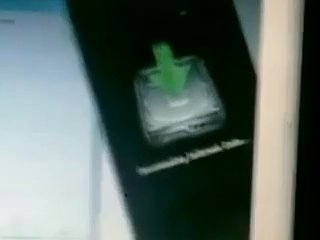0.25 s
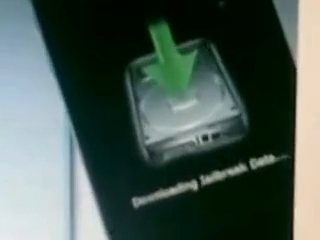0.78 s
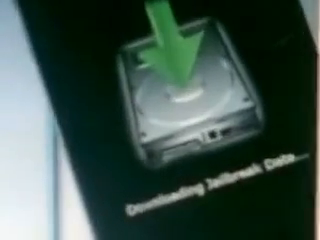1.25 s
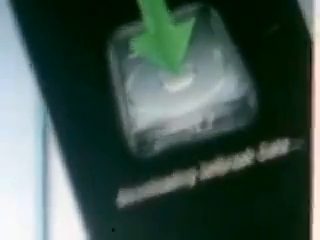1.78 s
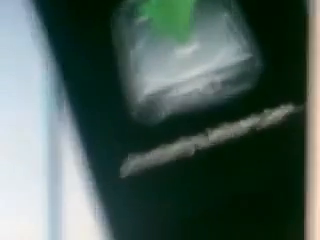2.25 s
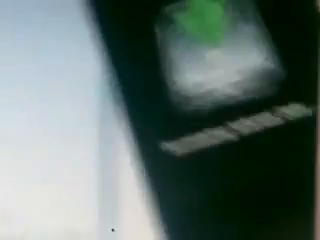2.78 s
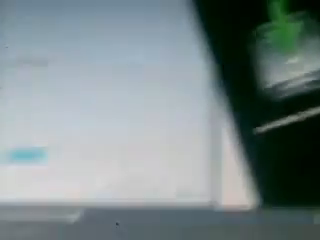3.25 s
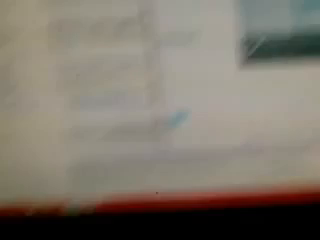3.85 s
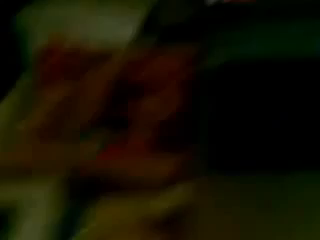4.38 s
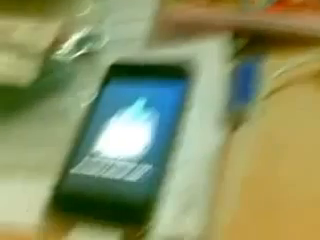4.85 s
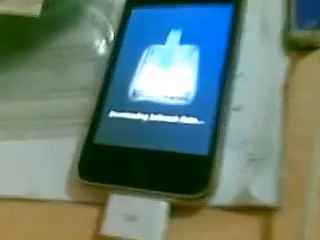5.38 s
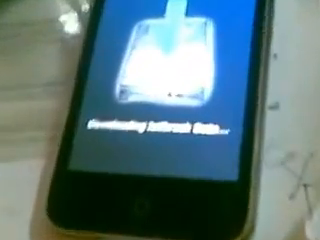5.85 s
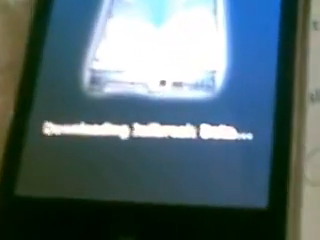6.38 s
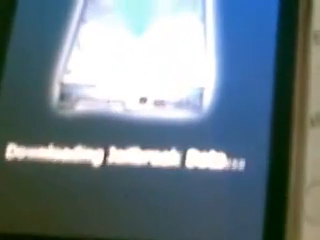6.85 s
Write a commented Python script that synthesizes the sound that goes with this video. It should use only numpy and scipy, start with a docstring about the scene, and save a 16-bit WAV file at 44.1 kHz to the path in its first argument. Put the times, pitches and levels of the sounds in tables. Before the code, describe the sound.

In a quiet indoor room, a small cheap microphone picks up its own casing being gripped and moved. Short dry knocks with crisp plastic clicks come singly and in two irregular clusters, the second busier and scuffed by fingers. Beneath them runs a soft constant buzz, slightly changing in colour, with low hum, rumble and hiss.

```python
"""A small hand-held camera is moved about indoors. Faint knocks and rubs on its plastic casing come first,
a hard knock at 1 s, a cluster from 2 to 2.6 s, a denser one from 4.6 to 5.4 s with the strongest rub, and
a last knock near 6.5 s. Knocks are decaying modes, clicks short noise bursts, rubs grainy noise.
Throughout lie a buzz of overtones whose colour changes with the grip, mains hum, preamplifier hiss and
rumble, and low-mid room noise."""
import sys
import numpy as np
from scipy.fft import rfft, irfft, next_fast_len
from scipy.io import wavfile
from scipy.ndimage import uniform_filter1d, map_coordinates

SR = 44100
rng = np.random.default_rng(int(sys.argv[2]) if len(sys.argv) > 2 else 0)


def pcm_store(signal):
    """Save signal as 16-bit PCM."""
    levels = np.round(np.clip(np.atleast_2d(signal), -1, 1) * 32767)
    wavfile.write(sys.argv[1], SR, levels.astype(np.int16).T)


N = 313639

# Dull knocks on the shell. Each row: start in seconds, shell peak in dB, pitch in Hz, thump level in dB,
# hardness in dB added to the upper modes, loss in dB at each rebound (twice that for the thump).
KNOCKS = [(0.158, -45, 586, -64, -6, 30), (0.251, -44, 636, -55, -5, 30), (0.9964, -9.5, 289, -28.5, 6, 16),
          (1.9872, -30, 298, -52, 7, 8), (2.006, -10, 425, -25.5, 0.5, 21), (2.047, -30.5, 376, -51, 2, 10),
          (2.074, -33.5, 487, -61, -4, 30), (2.084, -23, 386, -44, -9, 13),
          (2.1685, -15.5, 364, -28, -4.5, 15), (2.189, -44, 150, -39, -11, 14),
          (2.2815, -38, 580, -43, -14, 21), (2.2951, -27, 530, -31, -10.5, 14),
          (2.3107, -34, 310, -37, -13, 15), (2.345, -39, 150, -31, -11, 6), (2.357, -23.5, 291, -36, 0, 17),
          (2.367, -37, 151, -28, 11, 19), (2.562, -43, 300, -46, 4, 30), (2.582, -13, 587, -22, -2, 30),
          (4.6156, -35, 314, -54, -3, 33), (4.639, -36.5, 605, -43, 1, 30),
          (4.688, -12, 566, -19, -2.5, 8.5), (4.8988, -27, 363, -33, -0.5, 30),
          (4.9337, -38, 150, -41, -8, 9), (4.9515, -20.5, 270, -28, 1, 34),
          (4.9697, -35, 150, -37, -11, 30), (4.9827, -25, 403, -45, 17.5, 30),
          (4.9877, -6, 508, -15.5, -7.5, 11), (5.0062, -34, 300, -43, -8, 17),
          (5.1354, -26.5, 239, -34, 8, 30), (5.1425, -23, 211, -48, 15, 30),
          (5.1479, -26, 147, -22.5, 10, 24), (5.23, -46, 490, -50, -5, 30),
          (5.272, -37.5, 240, -49, -2, 30), (5.3666, -11, 482, -27, -3, 31),
          (6.5312, -9, 264, -21.5, 5, 15.5)]
# Bending modes of the shell. Each row: multiple of the pitch, mean relative level in dB.
SHELL_MODES = [(1.001, 0.5), (1.45, -3.5), (2.1, -5), (2.9, -8.5)]
# Rocking of the whole body. Each row: frequency in Hz, relative level in dB, t60 in seconds.
THUMP_MODES = [(68, 3.5, 0.022), (132, 6, 0.016)]
# Snaps of the plastic seams. Each row: peak time in seconds, then snap, crack and tick levels in dB.
CLICKS = [(0.95, -52, -43, -50), (0.9613, -48, -43, -36.5), (0.998, -11.5, -13.5, -20),
          (2.0044, -19, -25, -19), (2.0053, -21.5, -14, -19), (2.0836, -24.5, -24.5, -39),
          (2.167, -32, -38.5, -44), (2.1865, -44, -60, -61), (2.2919, -46, -43.5, -40),
          (2.296, -35, -51, -59), (2.3557, -32, -40.5, -33), (2.3592, -35.5, -43, -53),
          (2.552, -41, -55, -60), (2.584, -25, -23.5, -33), (4.5644, -33.5, -30.5, -25),
          (4.6149, -29, -24, -32), (4.64, -26, -23, -21.5), (4.686, -55, -38, -35), (4.69, -23, -36, -36),
          (4.6946, -25.5, -30.5, -20.5), (4.9188, -44, -47, -47), (4.935, -44, -46, -55),
          (4.952, -33.5, -52, -55), (4.9658, -37, -38, -42), (4.985, -24, -47, -48),
          (4.9886, -23.5, -22.5, -30), (4.9917, -21, -17.5, -23), (4.996, -41, -41, -36),
          (5.0008, -33, -32, -31), (5.1353, -35, -47, -58), (5.1471, -31.5, -36, -42.5),
          (5.3676, -15.5, -29.5, -23), (6.5078, -46.5, -39, -41), (6.532, -14.5, -23, -25),
          (6.8368, -57, -53, -43.5)]
# Spectra of the three click bands. Each row: frequency in Hz, relative density in dB per Hz.
SNAP_SPECTRUM = [(600, -65), (1100, 5.5), (1500, -1), (2300, 3), (3300, -8), (6000, -76)]
CRACK_SPECTRUM = [(1500, -43), (2500, -22), (3200, 1), (4700, 0.5), (6500, -5), (10000, -36)]
TICK_SPECTRUM = [(4000, -83), (6000, 6), (8400, 8), (11000, 5.5), (14500, 1.5), (16500, -36)]
# Finger slides over the shell. Each row: start in seconds, bright level in dB, dull level in dB,
# t60 in seconds.
RUBS = [(0.294, -49, -67, 0.22), (0.517, -38.5, -56.5, 0.24), (1.65, -50, -70, 0.11),
        (2.168, -49, -40, 0.16), (2.269, -53, -45, 0.2), (2.343, -53, -34.5, 0.11), (2.62, -54, -64, 0.17),
        (4.91, -52, -50, 0.36), (4.983, -25.5, -19, 0.073), (5.135, -40, -26, 0.078),
        (5.215, -61, -50, 0.13)]
# Friction through the body (dull) and on the skin of the shell (bright).
# Each row: frequency in Hz, relative density in dB per Hz.
DULL_SPECTRUM = [(60, -32), (200, -1.5), (600, -1.5), (1200, -18), (2500, -28), (6000, -120)]
BRIGHT_SPECTRUM = [(530, -19), (900, -11), (1600, 7), (2230, 2), (2540, 5), (3170, 0), (3530, -3.5),
                   (15000, -17.5)]
# Buzz overtones before grip and waver. Each row: frequency in Hz, level in dB rms.
BUZZ = [(293, -72.5), (586, -76), (1170, -73.5), (1760, -79), (2050, -72.5), (2340, -67), (2930, -66),
        (3220, -65.5), (3520, -70), (3810, -69.5), (4400, -74.5), (5300, -83.5), (7300, -90), (7910, -77),
        (8200, -76.5), (8800, -98), (11400, -91), (12300, -74), (12900, -77), (13500, -90)]
# Grips that recolour the buzz. Each row: start in seconds, then level, lean, scoop and flank in dB.
GRIPS = [(0, 1, 3.5, 5, -1.5), (1.0, -1.5, -7, 2.5, 0.5), (1.9, -0.2, -5, -4, 0.5),
         (2.4, 1.3, 2.5, -1.5, 1), (2.7, 1.9, 1, -0.5, -4.5), (4.6, 1.5, 3, -2, 1),
         (4.9, -0.5, -5, -2, -.5), (5.3, -2.5, 0.5, 3.5, 0.5), (5.7, -1, 1, 3, 0.5),
         (6.55, -0.7, -3.5, .5, 1)]
# How far each colour moves an overtone. Each row: frequency in Hz, share of the colour's dB.
LEAN_SHARE = [(2050, -0.4), (2930, -0.18), (3220, -0.51), (3810, 1.0), (4400, -0.3), (8000, 0.03),
              (12300, -0.15)]
SCOOP_SHARE = [(2050, 0.13), (2640, -0.18), (3220, -0.39), (3520, 0.54), (4100, 0.51), (8000, -0.67),
               (12300, .7)]
FLANK_SHARE = [(1760, 0.15), (2050, 1), (2340, .8), (2640, 0.06), (11700, .05), (12300, 1.1), (12900, .3)]
# Resonance setting the overtone phases: centre in Hz, width in Hz.
PULSE_RING = (3200, 800)
# Preamplifier hiss and rumble. Each row: frequency in Hz, relative density in dB per Hz.
HISS_SPECTRUM = [(10, -11), (25, 4), (80, 0), (130, -6.5), (250, -6.5), (600, -33.5), (1000, -20),
                 (1250, -15), (2200, -17), (3000, -18.5), (5500, -25), (9000, -23.5), (15000, -21.5)]
# Low-mid room noise over time. Each row: time in seconds, level in dB rms.
ROOM_LEVEL = [(0.0, -58.5), (1.39, -60.5), (1.82, -60), (2.15, -57), (2.4, -59.5), (3.11, -60),
              (4.32, -61.5), (5.23, -62), (5.58, -66), (5.96, -63.5), (6.59, -62.5), (7.11, -65)]
# Room noise spectrum. Each row: frequency in Hz, relative density in dB per Hz.
ROOM_SPECTRUM = [(120, -6), (250, -4), (600, -4), (1100, -8.5), (2000, -36), (5000, -120)]

RING_MS, RING_MS_PER_DB = 10, 0.48  # t60 of a 0 dB knock; lighter touches damp the shell less
PRESS_S = 0.0013
REBOUND_S, REBOUND_PITCH_RATIO = 0.00596, 0.93
CLICK_BUILD_T60_S, CLICK_T60_S = 0.0021, 0.0052
RATTLE_BUILD_T60_S, RATTLE_T60_S, RATTLE_DB = 0.018, 0.033, -25
RUB_RISE_S = 0.0027
PULSE_HZ, GRIP_SETTLE_S = 292.97, 0.051
HUM_HZ, HUM_DB = 99.5, -54
SPIN_HZ, SPIN_DB = 91.3, -65.5
HISS_DB, HISS_TOP_HZ = -54, 15100
LOW_CUT_HZ, TOP_HZ = 25, 16500


def amp(db):
    """dB to linear amplitude."""
    return 10 ** (np.asarray(db) / 20)


def unit(x):
    """Scale to rms 1."""
    return x / np.sqrt(np.mean(x ** 2) + 1e-20)


def curve(rows):
    """(seconds, value) rows interpolated to one value per sample."""
    s, value = np.transpose(rows)
    return np.interp(np.arange(N) / SR, s, value)


def wobble(rate_hz):
    """Smooth random curve through rate_hz normal-distributed knots a second."""
    knots = rng.standard_normal(int(N * rate_hz / SR) + 4)
    return map_coordinates(knots, [np.arange(N) * rate_hz / SR])


def filtered(x, response):
    """Multiply the spectrum of x by response(Hz)."""
    size = next_fast_len(N + 8192)
    gain = response(np.fft.rfftfreq(size, 1 / SR))
    return irfft(rfft(x, size) * gain, size)[..., :N]


def noise(spectrum):
    """Noise of rms 1, its (Hz, dB) spectrum interpolated on a log frequency axis."""
    f, db = np.transpose(spectrum)
    return unit(filtered(rng.standard_normal(N),
                         lambda hz: amp(np.interp(np.log(hz + 1), np.log(f + 1), db))))


def knocks():
    """Each knock rings the shell's modes at new strengths, rocks the body and rebounds twice."""
    out = np.zeros(N + SR)
    t = np.arange(SR // 10) / SR
    contacts = []
    for s, db, hz, thump_db, hard_db, loss_db in KNOCKS:
        for n in range(3):
            contacts.append((s + REBOUND_S * n, db - loss_db * n, hz * REBOUND_PITCH_RATIO ** n,
                             thump_db - 2 * loss_db * n, hard_db))
    scatter_db = 1.2 * rng.standard_normal((len(contacts), len(SHELL_MODES)))
    body = sum(amp(db - 60 * t / t60_s) * np.sin(2 * np.pi * hz * t) for hz, db, t60_s in THUMP_MODES)
    press = 1 - np.exp(-(t / PRESS_S) ** 2)  # a fingertip lands softly
    for (s, db, hz, thump_db, hard_db), chances_db in zip(contacts, scatter_db):
        t60_s = (RING_MS - RING_MS_PER_DB * db) / 1e3
        shell = 0
        for (multiple, mode_db), chance_db in zip(SHELL_MODES, chances_db):
            fade = amp(-60 * t / t60_s * multiple ** 0.4)  # higher modes die sooner
            level = amp(mode_db + chance_db + hard_db * (multiple > 1.2))
            shell = shell + level * fade * np.sin(2 * np.pi * multiple * hz * t)
        shell = press * shell
        shell /= np.max(np.abs(shell))
        start = round(s * SR)
        out[start:start + len(t)] += amp(db) * shell + amp(thump_db) * press * body
    return out[:N]


def clicks():
    """Very short noise bursts in three bands: strain builds for a moment, snaps and rattles out."""
    lead = SR // 100
    t = np.arange(-lead, SR // 20) / SR
    out = np.zeros(N + SR)
    bands = np.array([noise(SNAP_SPECTRUM), noise(CRACK_SPECTRUM), noise(TICK_SPECTRUM)])
    snap = np.where(t < 0, amp(60 * t / CLICK_BUILD_T60_S), amp(-60 * t / CLICK_T60_S))
    rattle = np.where(t < 0, amp(60 * t / RATTLE_BUILD_T60_S), amp(-60 * t / RATTLE_T60_S))
    shape = snap + amp(RATTLE_DB) * rattle
    for peak_s, *levels_db in CLICKS:
        first = round(peak_s * SR) - lead
        at = slice(first, first + len(t))
        burst = shape * bands[:, at]
        # scale each burst to equal energy, so the row's levels set its loudness
        burst /= np.linalg.norm(burst, axis=1, keepdims=True) / np.linalg.norm(shape)
        out[at] += amp(levels_db) @ burst
    return out[:N]


def rubs():
    """Grainy friction noise, bright on the shell's skin, dull through its body; fast start, slower fade."""
    t = np.arange(N) / SR
    bright, dull = np.zeros(N), np.zeros(N)
    for s, bright_db, dull_db, t60_s in RUBS:
        since = np.maximum(t - s, 0)
        stroke = amp(-60 * since / t60_s) * (1 - np.exp(-since / RUB_RISE_S))
        bright += amp(bright_db) * stroke
        dull += amp(dull_db) * stroke
    bright_grain = unit(amp(2.8 * wobble(250)) * noise(BRIGHT_SPECTRUM))
    dull_grain = unit(amp(1.7 * wobble(110)) * noise(DULL_SPECTRUM))
    return bright * bright_grain + dull * dull_grain


def buzz():
    """Overtones of one steady electrical pulse train, phased as spikes that ring out; grip recolours it."""
    t = np.arange(N) / SR
    starts_s, *colours_db = np.transpose(GRIPS)
    grip_index = np.maximum(np.searchsorted(starts_s, t, "right") - 1, 0)
    held_db = np.array(colours_db)[:, grip_index]
    level_db, lean_db, scoop_db, flank_db = uniform_filter1d(held_db, round(GRIP_SETTLE_S * SR), axis=1)
    ring_hz, width_hz = PULSE_RING
    out = np.zeros(N)
    for hz in PULSE_HZ * np.arange(1, 46):
        waver_db = 0.8 * wobble(4)
        db, lean, scoop, flank = (np.interp(hz, *np.transpose(rows))
                                  for rows in (BUZZ, LEAN_SHARE, SCOOP_SHARE, FLANK_SHARE))
        lag = np.arctan((hz * hz - ring_hz * ring_hz) / (hz * width_hz))
        grip_db = level_db + lean * lean_db + scoop * scoop_db + flank * flank_db
        out += amp(db + grip_db + waver_db) * np.cos(2 * np.pi * hz * t - lag)
    return np.sqrt(2) * out  # rms to peak


def hum():
    """Twice the mains frequency and a fainter motor tone below it, both wavering in level and phase."""
    t = np.arange(N) / SR
    mains = amp(HUM_DB + 1.0 * wobble(6)) * np.sin(2 * np.pi * HUM_HZ * t + 0.27 * wobble(4.7))
    spin = amp(SPIN_DB + 3.0 * wobble(1.56)) * np.sin(2 * np.pi * SPIN_HZ * t + 0.3 * wobble(2.6))
    return np.sqrt(2) * (mains + spin)  # rms to peak


def preamp_hiss():
    """Preamplifier hiss and rumble: shaped noise, cut at the hiss limit, barely wavering in level."""
    hiss = filtered(noise(HISS_SPECTRUM), lambda hz: hz < HISS_TOP_HZ)
    return amp(HISS_DB + 0.39 * wobble(2.42)) * hiss


def room_noise():
    """Low-mid noise made lumpy by a random level, under a slow level curve."""
    lumps = amp(1.5 * wobble(40))
    return amp(curve(ROOM_LEVEL)) * unit(lumps * noise(ROOM_SPECTRUM))


def scene():
    """Sum of all sources, one channel."""
    handling = knocks() + clicks() + rubs()
    background = buzz() + hum() + preamp_hiss() + room_noise()
    return (handling + background)[None]


def record(dry):
    """The small microphone loses the deepest bass; the camera keeps nothing above its band limit."""
    return filtered(dry, lambda hz: (hz < TOP_HZ) * 1j * hz / (LOW_CUT_HZ + 1j * hz))


dry = scene()
out = record(dry)
pcm_store(out)
```